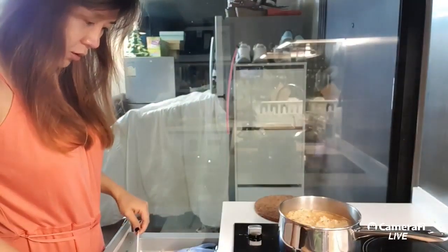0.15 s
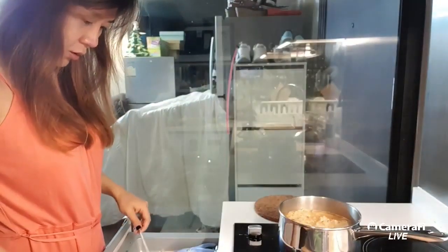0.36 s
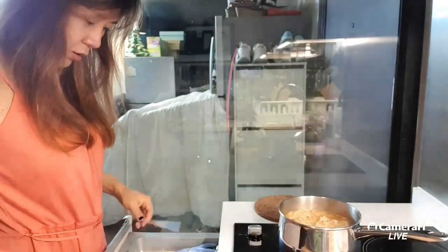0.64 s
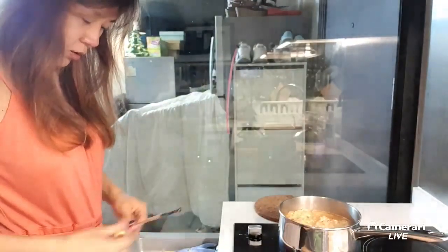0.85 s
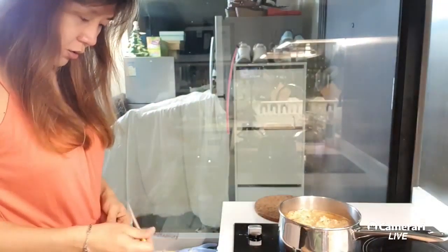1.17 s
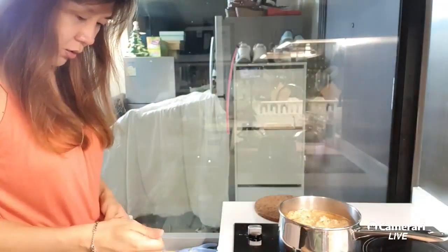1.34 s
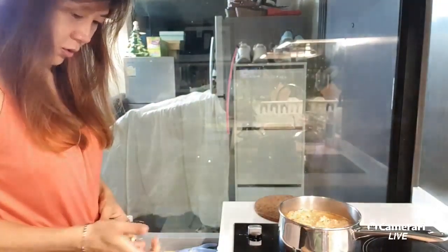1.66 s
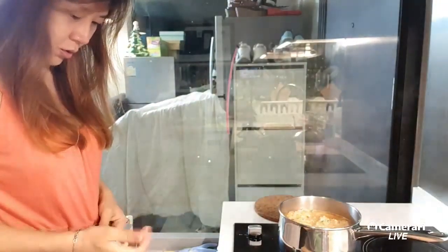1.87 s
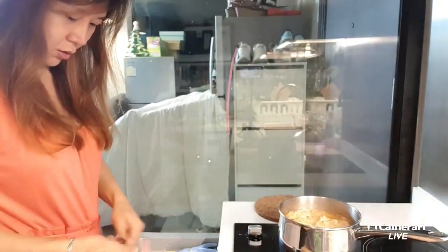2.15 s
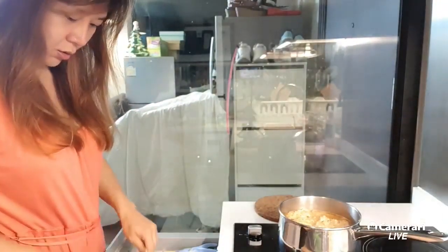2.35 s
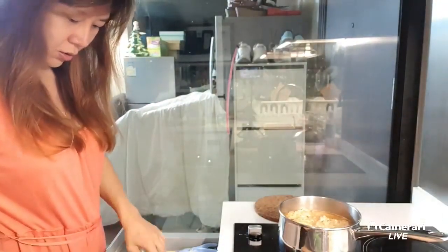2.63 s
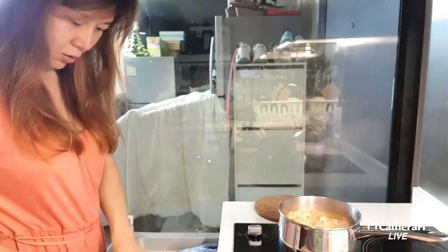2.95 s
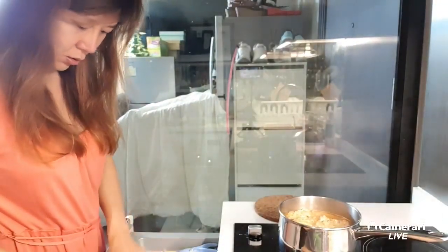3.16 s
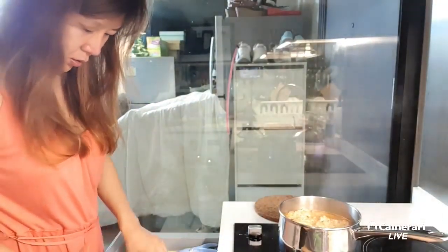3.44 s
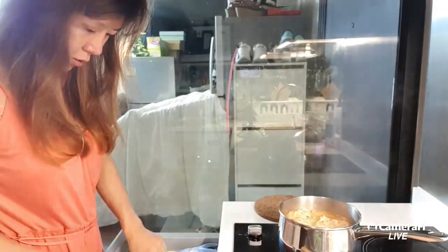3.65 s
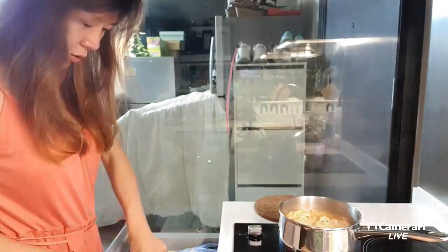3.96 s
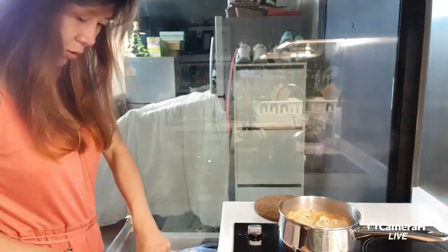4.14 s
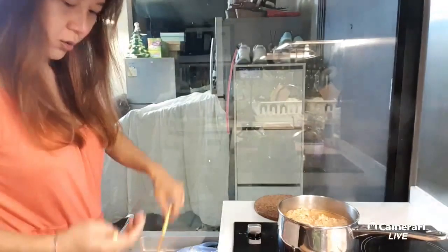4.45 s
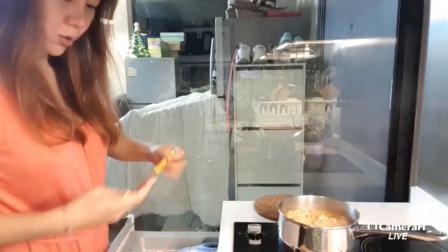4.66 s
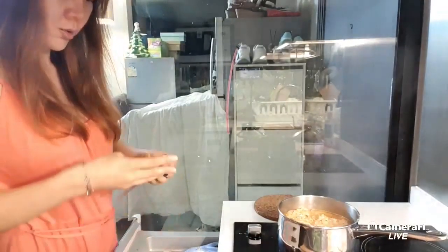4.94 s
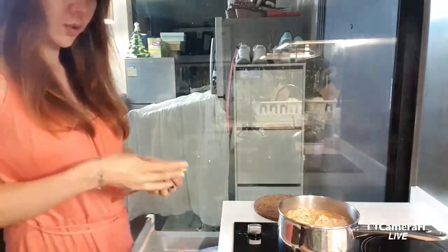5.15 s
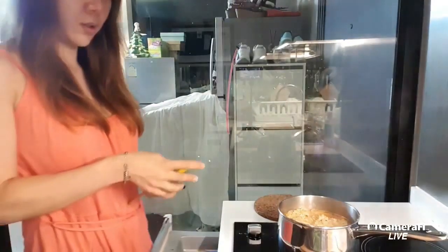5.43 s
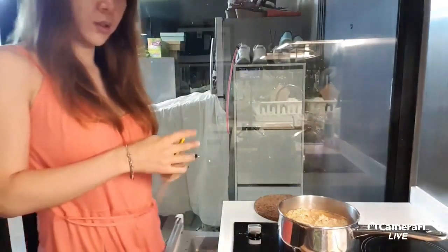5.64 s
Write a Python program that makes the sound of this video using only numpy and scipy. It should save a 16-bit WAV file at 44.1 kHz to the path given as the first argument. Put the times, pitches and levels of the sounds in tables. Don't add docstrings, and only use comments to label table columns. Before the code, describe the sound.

Steel cutlery clatters at once in a wooden drawer tray, sharp bright clinks over dull thuds, then eases to faint dry ticks of chopsticks. A harder, longer dig follows, dense rattling with strong clanks and short high rings. It stops; a few light ticks remain while the drawer moves with a soft low knock and rumble. Small hard kitchen, close phone microphone, faint hiss.

```python
import sys
import numpy as np
from scipy import signal
from scipy.io import wavfile

SR = 44100
rng = np.random.default_rng(int(sys.argv[2]) if len(sys.argv) > 2 else 0)


def generate_wav(sig):
    pcm = np.round(np.clip(np.atleast_2d(sig).T, -1, 1) * 32767).astype(np.int16)
    wavfile.write(sys.argv[1], SR, pcm)


def gain_from_db(level_db):
    decades = np.asarray(level_db, float) / 20
    return 10 ** decades


N = 255780
STICK_TOP_HZ = 3000

# start_s, peak_db, piece_hz, wood_db
TICKS = [(1.3776, -47.5, 5240, -12), (1.4914, -51.5, 2140, -25), (1.6313, -39.5, 6830, -20),
         (1.6345, -47, 3650, -18), (1.652, -49, 2000, -12), (1.803, -47.5, 2160, -11),
         (2.0306, -51, 2250, -13), (2.067, -43.5, 7450, -35), (2.2374, -56, 7640, -30),
         (2.3819, -49, 2200, -7.5), (2.4056, -42.5, 5060, -18), (2.518, -56, 2080, -7),
         (2.5772, -51, 2140, -12), (2.619, -53, 2040, -13), (5.09, -49.5, 2420, -13),
         (5.1244, -46, 7840, -30), (5.225, -42.5, 1580, -4.5), (5.3304, -44.5, 7920, -30),
         (5.4178, -46.5, 7500, -30), (5.6228, -45.5, 7680, -24), (5.7592, -41.5, 6670, -14)]


def rms_one(x):
    return x / np.sqrt(np.mean(x ** 2) + 1e-20)


def at_hz(points, hz):
    table_hz, value = np.transpose(points)
    return np.interp(np.log(hz), np.log(table_hz), value)


def band(x, low_hz, high_hz):
    return signal.sosfilt(signal.butter(2, [low_hz, high_hz], "band", fs=SR, output="sos"), x + 1e-18)


def decay_per_sample(t60_s):
    return gain_from_db(-60 / (t60_s * SR))


def drift(rate_hz):
    knots = rng.standard_normal(N // 64 + 2)
    return np.interp(np.arange(N) * rate_hz / SR, np.arange(len(knots)), knots)


def fickle(level_db, spread_db, rate_hz, top=9):
    knots = np.minimum(rng.standard_normal(N // 64 + 2), top)
    steps = np.interp(np.arange(0, N, 32) * rate_hz / SR, np.arange(len(knots)), knots)
    return np.repeat(gain_from_db(level_db + spread_db * steps), 32)[:N]


def ring(x, hz, t60_s):
    r, w = decay_per_sample(t60_s), 2 * np.pi * hz / SR
    return signal.lfilter([0, np.sin(w)], [1, -2 * r * np.cos(w), r * r], x + 1e-18)


def body(x, modes, fickle_db):
    out = np.zeros(N)
    for hz, width_hz, level_db in modes:
        struck = x * fickle(level_db, fickle_db, 35)
        out += np.sqrt(width_hz) * ring(struck, hz, 1.4 / width_hz)
    return out


def contacts(per_s, spread_db):
    sizes = gain_from_db(spread_db * np.minimum(rng.exponential(1, N), 4))
    signs = rng.choice([-1, 1], N)
    return rms_one(sizes * signs * (rng.random(N) < per_s / SR))


def sing(notes):
    out = np.zeros(N)
    for start_s, hz, level_db, t60_s in notes:
        i, t60_s = round(start_s * SR), np.clip(t60_s, .02, .3)
        age = np.arange(int(t60_s * SR)) / SR
        beat = 1 + .35 * np.sin(2 * np.pi * (rng.uniform(25, 70) * age + rng.random()))
        swell = np.minimum(age / min(.004, t60_s / 20), 1)
        tone = gain_from_db(level_db - 60 * age / t60_s) * beat * swell * np.sin(2 * np.pi * hz * age)
        out[i:i + len(age)] += tone[:N - i]
    return out


def steel(blows, pile_db):
    # mode_hz, level_db, t60_s
    spoons = [(4860, -14, .15), (5744, -14, .15), (6261, -10, .15), (7391, -8, .2), (7765, -7, .2),
              (8845, -9, .2), (9920, -8, .2), (11140, -4, .2), (11700, -7, .2), (12220, -4, .15),
              (12940, -9, .15), (13690, -1, .2), (14460, -2, .15)]
    # mode_hz, level_db, t60_s
    pile = [(3680, -8, .1), (4970, -9, .08), (5400, -10, .08), (6540, -6, .08), (7200, -3, .1),
            (7520, -5, .08), (7880, -2, .1), (8780, -6, .12), (9600, -10, .08), (10260, -9, .08),
            (10870, -8, .1), (11700, -6, .1), (12200, -4, .1), (13500, -6, .08), (13800, -6, .08),
            (14420, -4, .08), (14900, -7, .08)]
    jingle_s = [
        .5,
        1.27,
        3.45,
        3.62,
        4.41,
        4.54,
    ]
    in_hand = np.searchsorted(jingle_s, np.arange(N) / SR) % 2 == 1
    out = np.zeros(N)
    for hz, level_db, t60_s in spoons:
        out += ring(blows * in_hand * fickle(level_db - 3, 4.0, 30, top=1), hz, .8 * t60_s)
    for hz, level_db, t60_s in pile:
        out += ring(blows * ~in_hand * fickle(level_db + pile_db, 5.0, 35, top=1.5), hz, .5 * t60_s)
    return out


def heap(blows, wood_db, bright_db, ring_db, pile_db):
    # mode_hz, width_hz, level_db
    tray = [(95, 40, -19), (145, 30, -19.5), (189, 35, -5.5), (324, 35, -7), (451, 35, -4), (572, 41, -5),
            (722, 40, -0.5), (979, 51, -1.5), (1144, 86, 0), (1386, 73, -2.5), (1675, 200, -4),
            (2100, 83, -13)]
    boom, clack = blows[:2] * gain_from_db(wood_db)
    crack, edge = blows[2], blows[3] * gain_from_db(bright_db)
    thud = gain_from_db(-49.0) * band(body(boom, tray, fickle_db=3.0), 273, 9000) + band(clack, 543, 1700)
    noisy = thud + band(band(crack, 800, 9040), 300, 11000) + band(edge, 9340, 21900)
    rings = gain_from_db(-27.5) * steel(crack * gain_from_db(ring_db), pile_db)
    return np.array([noisy, rings])


def ticks():
    # start_s, peak_db
    touches = [(1.467, -50), (1.5459, -50), (1.6095, -49), (1.7823, -52), (1.8253, -53), (1.9, -54),
               (1.9589, -57), (2.1645, -54), (2.2862, -55), (2.4872, -54), (2.6708, -56)]
    touch_hz, touch_wood_db = 7600, -30
    stick_bright_db, metal_bright_db = -14, -6
    rows = TICKS + [(s, peak_db, touch_hz, touch_wood_db) for s, peak_db in touches]
    return [row + (stick_bright_db if row[2] < STICK_TOP_HZ else metal_bright_db,) for row in rows]


def clashes():
    # start_s, peak_db, piece_hz, wood_db, bright_db
    search = [(.0005, -41, 1660, -33, -46), (.1102, -43, 1530, 4, -33), (.187, -29, 7720, -2.5, 1),
              (.2498, -25.5, 11360, -18, -16), (.3645, -36, 7600, -7, -5), (.39, -30.5, 7880, -13.5, -3),
              (.4524, -45.5, 7440, 0, -59), (.5115, -28, 7300, -14, -25), (.5184, -23.5, 7000, -10.5, -35),
              (.5458, -7.5, 6520, -21, -32), (.728, -28.5, 14660, -17, -14), (.8193, -25, 11800, -29, -26),
              (.9408, -23, 13500, -51, 4.5), (.9797, -21.5, 7650, -21, -28),
              (.9941, -9.5, 3710, -16.5, -32), (1.0054, -22, 7550, -34, -16), (1.0844, -16, 7800, -14, 1.5),
              (1.1296, -19, 13700, -31, -26), (1.1874, -24, 7870, -28, -1), (1.2905, -27, 5420, -69, -5)]
    # start_s, peak_db, piece_hz, wood_db, bright_db
    plunge_and_dig = [(2.7057, -16.5, 7090, -25, -42), (2.7819, -14.5, 5900, -43, -7),
                      (2.8893, -19.5, 7350, -19, -27), (2.9023, -10.5, 1660, -14, -14),
                      (3.1609, -60, 1680, 18, -33), (3.184, -14.5, 11000, -19, -8), (3.2311, -15.5, 3710, -22, 1),
                      (3.2586, -11, 7200, -50, -3.5), (3.303, -12, 8750, -45.5, 4), (3.3754, -30.5, 1644, 1, -30),
                      (3.4608, -31, 7600, -21, -5),
                      (3.548, -33, 7920, -14, -9), (3.59, -28, 7560, -20, -1), (3.6269, -22, 1980, -18, -23),
           (3.6588, -16, 7170, -64, -3), (3.7116, -9, 13450, -18, 0.5), (3.8399, -23, 7950, -18, -9),
           (3.8783, -20, 11700, -45, 8.5), (3.9217, -21, 7870, -17.5, -33),
           (3.9693, -26.5, 7470, -14.5, -18), (4.038, -25, 1530, -25, 1.5), (4.224, -26, 13900, -17, -2.5),
           (4.2645, -26, 6140, -37, -24.5), (4.344, -28, 7400, -17, 3), (4.414, -22, 7340, -31, -14.5),
           (4.5558, -7.5, 6540, -27.5, -3), (4.626, -18.5, 7560, -7.5, 6), (4.7119, -22, 13900, -11, -1.5),
           (4.8185, -26, 7700, -12, -7), (4.839, -18, 7400, -11.5, 0)]
    rise_s, chatter_t60_s, ping_t60_s = 0.00072, 0.017, .022
    start_s, peak_db, piece_hz, wood_db, bright_db = np.transpose(sorted(search + plunge_and_dig + ticks()))

    at = np.round(start_s * SR).astype(int)
    owner = np.clip(np.searchsorted(at, np.arange(N), side="right") - 1, 0, None)
    force = np.zeros(N)
    force[at] = gain_from_db(peak_db - 15.2)
    force = signal.lfilter([1], [1, -decay_per_sample(chatter_t60_s)], force)
    soft = np.exp(-1 / (rise_s * SR))
    force = signal.lfilter([1 - soft], [1, -soft], force)
    blows = force * rng.standard_normal((4, N))

    hollow = (piece_hz > 1900) * (piece_hz < STICK_TOP_HZ)
    ping_db = peak_db - 21 + 0.19 * bright_db + 0.0066 * wood_db + 4.5 * hollow
    t60_s = np.full(len(at), ping_t60_s)
    pings = sing(zip(start_s, piece_hz, ping_db, t60_s))
    pings = pings + sing(zip(start_s, .965 * piece_hz, ping_db - 4.0, t60_s))
    return heap(blows, wood_db[owner] + 18.0, bright_db[owner] + 7.0, np.full(N, -8.0), pile_db=-13.5) + pings


def stirring():
    # peak_s, rattle_db, rise_s, fall_s, steel_db
    strokes = [(.002, -31.5, 0.03, 0.016, -7), (.11, -51.5, 0.035, 0.092, -14),
               (0.19, -40.5, 0.088, 0.13, -8), (.4, -54, 0.18, 0.71, -25), (0.578, -31, 0.049, 0.12, 1),
               (.535, -35.5, 0.06, .05, -10), (.63, -36.5, 0.13, 0.054, 6), (.75, -42.5, 0.12, 0.12, 7),
               (.828, -40, 0.39, 0.18, -3), (1.015, -34.5, 0.03, 0.098, 1), (1.055, -33.5, .08, 0.034, 4),
               (1.11, -35, 0.027, 0.17, 5), (1.179, -37.5, 0.21, 0.087, 5)]
    # peak_s, rattle_db, rise_s, fall_s, steel_db
    dig_strokes = [(2.707, -39, 0.0087, 0.073, -16), (2.789, -38, 0.031, 0.13, -11),
                   (2.903, -28.5, 0.027, 0.12, -3.5), (3.193, -31, 0.019, 0.2, 2.5),
                   (3.25, -29.5, 0.08, 0.17, -3.5), (3.325, -28, .06, 0.081, 1),
                   (3.46, -46.5, 0.076, 0.093, -9), (3.69, -35.5, 0.24, .1, -2.5),
                   (3.718, -30, 0.15, 0.13, -1.5), (3.85, -46, 0.49, .1, -3), (3.884, -30, 0.011, 0.082, 5),
                   (3.909, -31.5, 0.046, 0.061, 0), (4.05, -39, 0.71, 0.21, -6.5),
                   (4.24, -47, 0.022, 0.48, -12), (4.35, -31.5, 0.03, 0.043, -6.5),
                   (4.451, -27, .12, 0.12, -2), (4.568, -22.5, 0.051, 0.11, 3.5),
                   (4.638, -33, 0.13, 0.21, -4), (4.845, -25.5, 0.046, 0.092, 2.5),
                   (4.868, -25, 0.074, 0.056, 3), (4.92, -40, .1, 0.098, 5)]
    swing_db, roundness, rest_db = 30, 1.154, -80
    rustles = [(s + 0.0017, peak_db - 18, .008, 0.15, -7) for s, peak_db, *_ in TICKS]
    rows = np.transpose(strokes + dig_strokes + rustles)
    peak_s, level_db, rise_s, fall_s, steel_db = rows[:, :, None]
    t = np.arange(0, N + 64, 64) / SR
    away = np.maximum((peak_s - t) / np.abs(rise_s), (t - peak_s) / np.abs(fall_s))
    each_db = level_db - swing_db * away ** roundness
    share = gain_from_db(np.maximum(each_db, -200))
    blend_db = (share * steel_db).sum(axis=0) / share.sum(axis=0)
    effort_db = np.maximum(each_db.max(axis=0), rest_db)
    return [np.interp(np.arange(N) / SR, t, v) for v in (effort_db, blend_db)]


def rattle():
    stir_db, steel_db = stirring()
    blows = contacts(2400, spread_db=3.3) * gain_from_db(stir_db + 2.2 * drift(60))
    strands = blows * rng.choice([-1, 1], (4, N))
    return heap(strands, 1 - 0.39 * steel_db, 4 + steel_db, 1.5 + 0.89 * steel_db, pile_db=-4.0)


def singing():
    # start_s, pitch_hz, level_db, t60_s
    singers = [(0.014, 10850, -68, 0.17), (0.255, 10870, -60, 0.11), (0.568, 13680, -42, 0.14),
               (0.571, 12220, -47, 0.26), (0.58, 14460, -42, 0.12), (0.583, 7390, -43, 0.15),
               (0.615, 9930, -50, 0.17), (0.629, 13680, -54, 0.1), (0.635, 12350, -53, 0.19),
               (0.638, 7410, -47, 0.15), (0.644, 14430, -55, 0.1), (0.731, 7780, -54, 0.13),
               (0.74, 14070, -50, 0.16), (0.771, 13680, -55, 0.15), (0.803, 11730, -48, 0.14),
               (0.809, 7750, -49, 0.12), (0.815, 10050, -57, 0.3), (0.844, 13700, -59, 0.12),
               (0.853, 7750, -53, 0.18), (0.879, 11140, -67, 0.13), (0.896, 11710, -68, 0.12),
               (1.009, 6220, -39, 0.13), (1.009, 7380, -44, 0.18), (1.018, 8800, -45, 0.14),
               (1.024, 14670, -52, 0.14), (1.027, 11150, -36, 0.19), (1.03, 12320, -50, 0.1),
               (1.044, 7770, -35, 0.17), (1.059, 14500, -45, 0.22), (1.082, 8800, -46, 0.08),
               (1.082, 9920, -48, 0.21), (1.082, 11660, -42, 0.18), (1.085, 13700, -40, 0.08),
               (1.111, 7750, -43, 0.1), (1.126, 13680, -41, 0.23), (1.146, 7740, -41, 0.06),
               (1.146, 14470, -45, 0.11), (1.158, 6260, -52, 0.21), (1.166, 8810, -49, 0.17),
               (1.184, 7740, -46, 0.08), (1.187, 9920, -52, 0.13), (1.288, 5300, -49, 0.14),
               (1.288, 7120, -54, 0.1), (1.628, 7250, -64, 0.14),
               (2.966, 13710, -60, 0.11), (3.183, 10770, -47, 0.13), (3.233, 3690, -40, 0.09),
                   (3.302, 8790, -35, 0.12), (3.317, 7770, -34, 0.09), (3.349, 8800, -43, 0.09),
                   (3.39, 8800, -55, 0.16), (3.462, 9930, -64, 0.15), (3.491, 13770, -74, 0.22),
                   (3.506, 8870, -63, 0.3), (3.546, 7920, -55, 0.09), (3.587, 10110, -59, 0.19),
                   (3.587, 12170, -58, 0.13), (3.59, 7870, -52, 0.13), (3.601, 13800, -57, 0.23),
                   (3.625, 1970, -48, 0.07), (3.654, 11310, -46, 0.08), (3.657, 7220, -42, 0.15),
                   (3.709, 7950, -36, 0.1), (3.709, 9920, -47, 0.13), (3.709, 14560, -32, 0.11),
                   (3.712, 12220, -37, 0.12), (3.729, 13720, -45, 0.11), (3.761, 12230, -49, 0.09),
                   (3.776, 9930, -57, 0.14), (3.842, 7880, -49, 0.07), (3.88, 11710, -38, 0.11),
                   (4.138, 13490, -65, 0.08), (4.266, 10810, -61, 0.21), (4.342, 13540, -49, 0.08),
                   (4.347, 7410, -47, 0.09), (4.347, 10840, -56, 0.13), (4.432, 14430, -46, 0.16),
                   (4.434, 9910, -49, 0.14), (4.437, 11730, -46, 0.15), (4.44, 7390, -44, 0.18),
                   (4.44, 11110, -46, 0.24), (4.44, 12220, -46, 0.18), (4.443, 7750, -45, 0.11),
                   (4.443, 13810, -46, 0.14), (4.469, 14930, -50, 0.14), (4.553, 3690, -38, 0.16),
                   (4.556, 6530, -36, 0.12), (4.62, 8800, -43, 0.07), (4.835, 10820, -43, 0.15),
                   (4.841, 6300, -42, 0.12), (4.841, 8690, -41, 0.2), (4.844, 7340, -40, 0.18),
                   (4.873, 4710, -45, 0.16), (5.093, 2600, -67, 0.09),
               (1.291, 5421, -62, .1), (1.291, 3558, -66, .08), (1.007, 11150, -45, .12),
                  (5.238, 1640, -66, .13), (2.78, 5650, -41, .07), (3.712, 5177, -40, .09),
                  (4.712, 5250, -57, .1), (1.008, 7770, -40, .12), (1.025, 13690, -48, .2),
                  (.548, 14460, -44, .12), (.573, 11140, -45, .2), (3.304, 12050, -37, .07),
                  (3.548, 12170, -61, .12), (3.462, 13770, -62, .2), (3.462, 12200, -63, .12),
                  (3.66, 5300, -48, .06), (3.88, 13100, -43, .07), (3.882, 7900, -42, .12),
                  (3.97, 7220, -50, .1), (4.56, 14600, -36, .12), (4.628, 7650, -39, .12),
                  (4.226, 12300, -54, .06), (3.259, 7300, -36, .06), (4.845, 12300, -41, .15),
                  (4.84, 13500, -41, .12), (1.165, 13690, -48, .2), (2.78, 6200, -42, .08)]
    notes = []
    for start_s, hz, level_db, t60_s in singers:
        lift_db = 6.0 + 3.5 * (hz > 9000 or hz < 6400)
        notes.append((start_s, hz, level_db + lift_db, t60_s))
    return sing(notes)


def hiss():
    # band_hz, level_db
    spectrum = [(30, 1.5), (45, 8), (75, 6), (189, -4.5), (245, -27), (374, 2), (600, -20.5), (988, -7),
                (1070, -15), (2230, -15), (3220, -23.5), (7670, -17), (9710, -44.5), (11400, -13),
                (13000, -29), (16000, -30)]
    out, white, together = 0, rng.standard_normal((2, N)), drift(7)
    edges_hz = 25 * 2 ** np.arange(0, 9.6, .4)
    for k, (low, high) in enumerate(zip(edges_hz, edges_hz[1:])):
        patches_db = 2.0 * drift(1.3) + 2.0 * drift(37) + 3.0 * together * (low > 900)
        out = out + gain_from_db(at_hz(spectrum, np.sqrt(low * high)) + patches_db) * band(white[k % 2], low, high)
    return gain_from_db(-65.0) * rms_one(out)


def knocks():
    low_hz, high_hz, level_db, rise_s, t60_s = 1400, 2600, -24, .006, .12
    force = np.zeros(N)
    for start_s, peak_db, hz, _ in TICKS:
        force[round(start_s * SR)] = gain_from_db(peak_db + level_db) * (hz < STICK_TOP_HZ)
    for fall in (np.exp(-1 / (rise_s * SR)), decay_per_sample(t60_s)):
        force = signal.lfilter([1], [1, -fall], force)
    patter = band(band(rng.standard_normal(N), low_hz, high_hz), low_hz, high_hz)
    return force / (rise_s * SR) * patter * gain_from_db(20)


def slide():
    # time_s, level_db
    effort = [
        (5.1, -97),
        (5.16, -72),
        (5.218, -65),
        (5.23, -50),
        (5.27, -58),
        (5.69, -63.5),
        (5.754, -55),
        (5.8, -59),
    ]
    # mode_hz, width_hz, level_db
    runners = [(84, 25, -8.5), (155, 7.3, 2), (191.6, 7, 2.5), (329, 24, -7), (450, 30, -2)]
    time_s, level_db = np.transpose(effort)
    effort_db = np.interp(np.arange(N) / SR, time_s, level_db, -120, -120)
    return gain_from_db(effort_db) * rms_one(body(contacts(300, spread_db=2.5), runners, fickle_db=-2.0))


def echoes():
    # band_hz, t60_s
    room_t60 = [(200, 0.4), (1000, 0.17), (4000, 0.3), (14000, 0.15)]
    age = np.arange(SR // 2) / SR
    white, tail = rng.standard_normal((2, len(age))), 0
    edges_hz = 110 * 2 ** np.arange(0, 7.6)
    early = gain_from_db(-6.0 - 60 * age / 0.081)
    for k, (low, high) in enumerate(zip(edges_hz, edges_hz[1:])):
        late = gain_from_db(-60 * age / at_hz(room_t60, np.sqrt(low * high)))
        tail = tail + band(white[k % 2], low, high) * (late + early)
    return gain_from_db(-21.0) * tail * np.minimum(age / .001, 1)


def room(x):
    turn = 2.8 * drift(7)
    wet = signal.fftconvolve(x * np.cos(turn), echoes()) + signal.fftconvolve(x * np.sin(turn), echoes())
    return gain_from_db(0.5) * x + wet[:N]


def scene():
    noisy, rings = clashes() + gain_from_db(-11.5) * rattle()
    rings = rings + singing()
    return (room(noisy + gain_from_db(-11.0) * rings) + rings + slide() + hiss() + knocks())[None]


def band_limit(x):
    return signal.sosfilt(signal.butter(12, 16630, fs=SR, output="sos"), x)


def record(dry):
    presence_hz, width_hz, presence_db = 7510, 2110, 3.5
    lift = band(dry, presence_hz - width_hz / 2, presence_hz + width_hz / 2)
    heard = band(dry + (gain_from_db(presence_db) - 1) * lift, 38, 21000)
    heard = signal.sosfilt(signal.ellip(8, .5, 45, 15850, fs=SR, output="sos"), heard)
    return band_limit(heard)


dry = scene()
out = record(dry)
generate_wav(out)
```